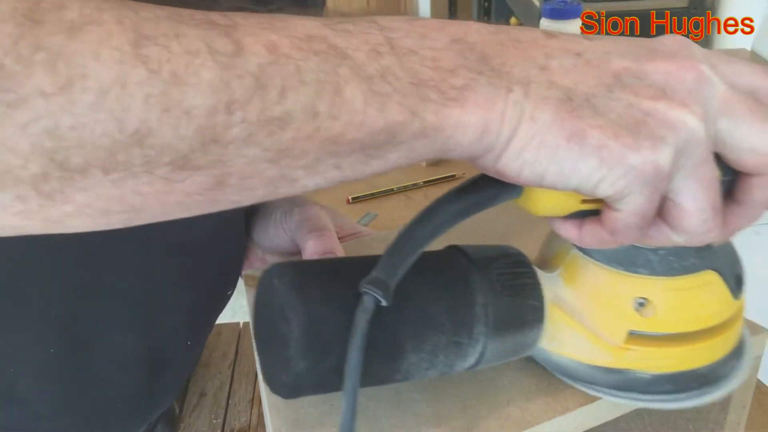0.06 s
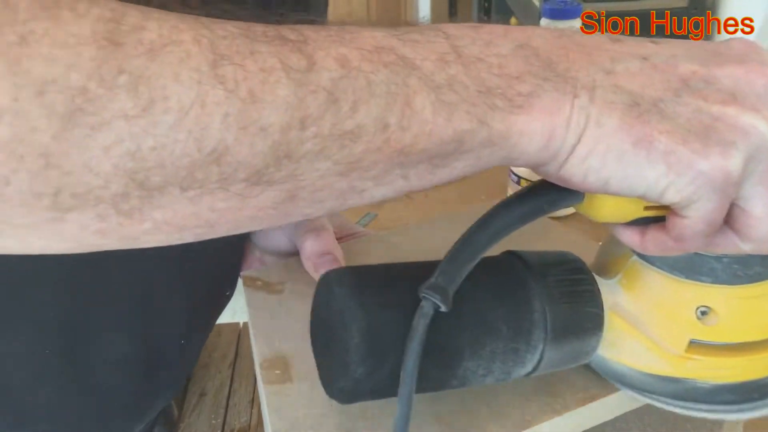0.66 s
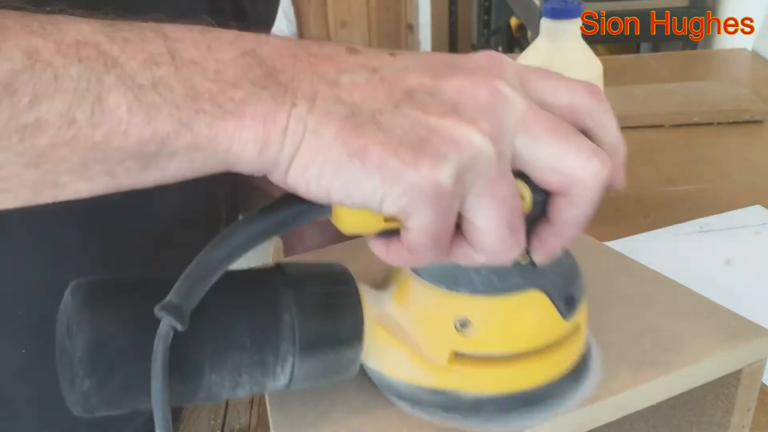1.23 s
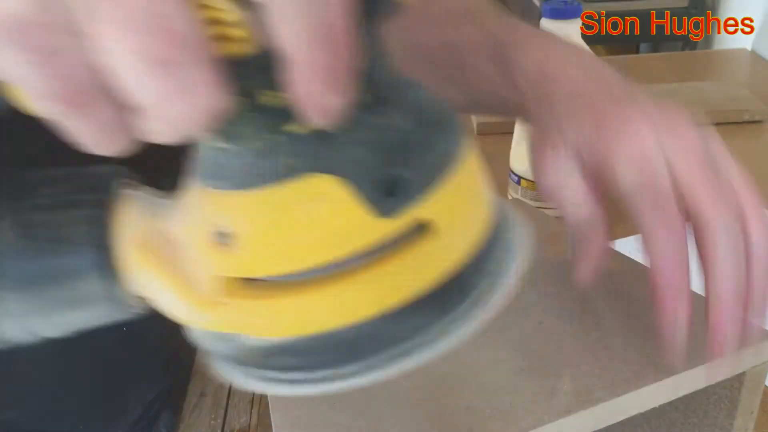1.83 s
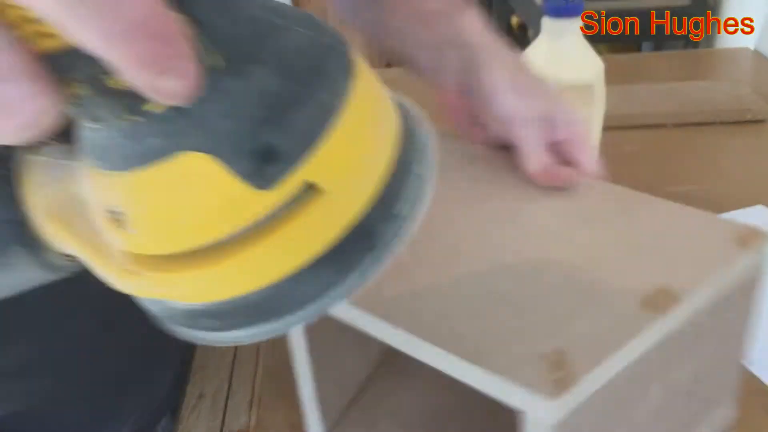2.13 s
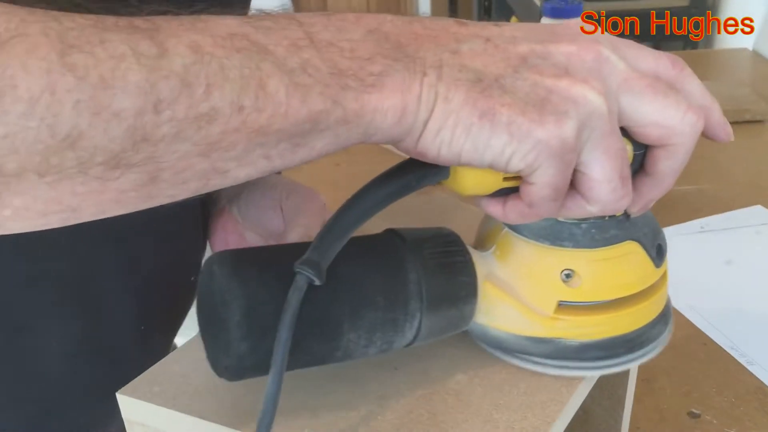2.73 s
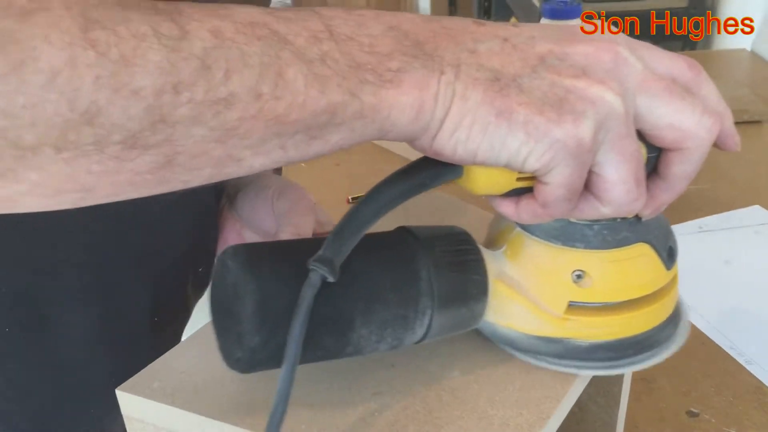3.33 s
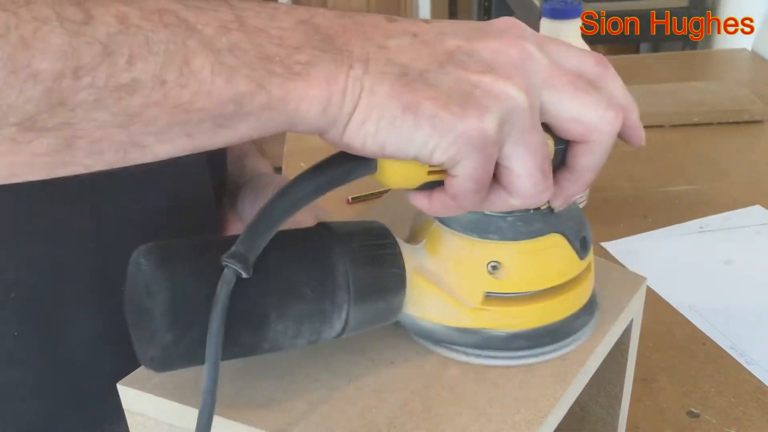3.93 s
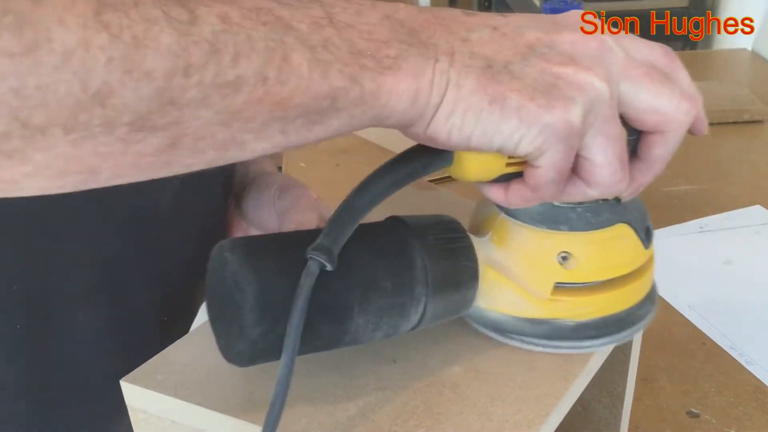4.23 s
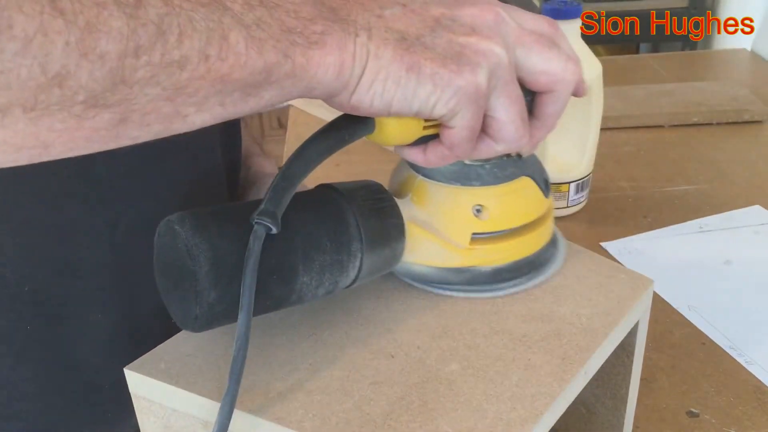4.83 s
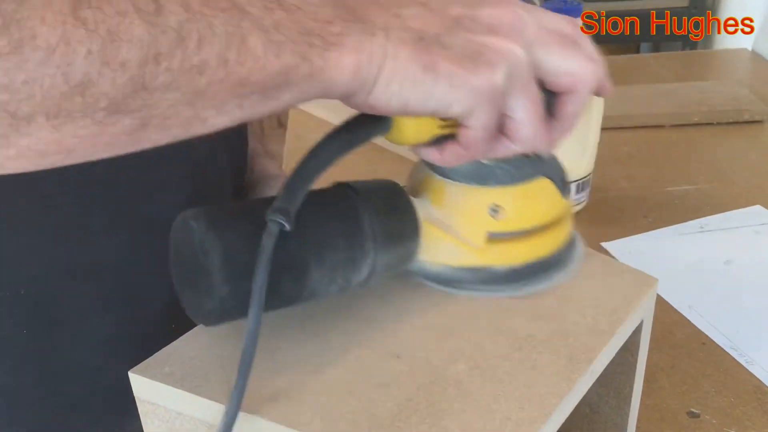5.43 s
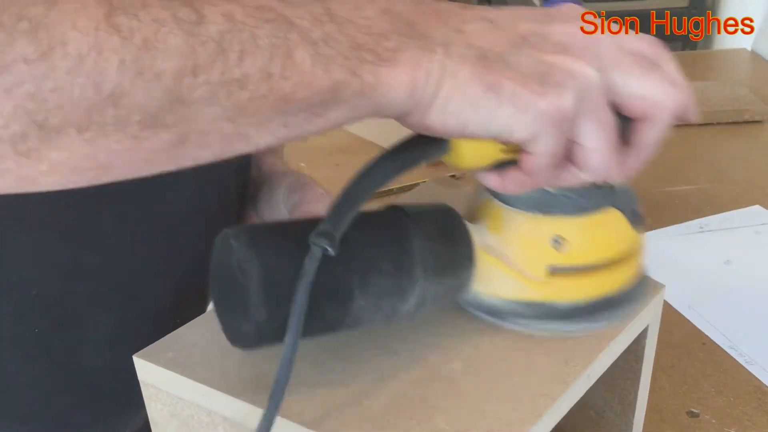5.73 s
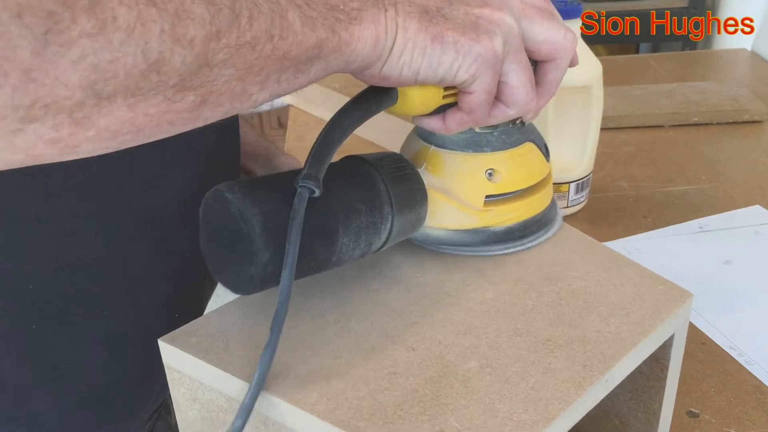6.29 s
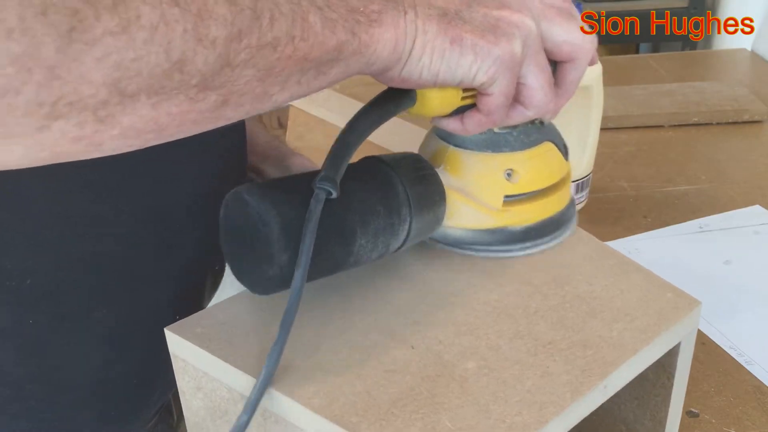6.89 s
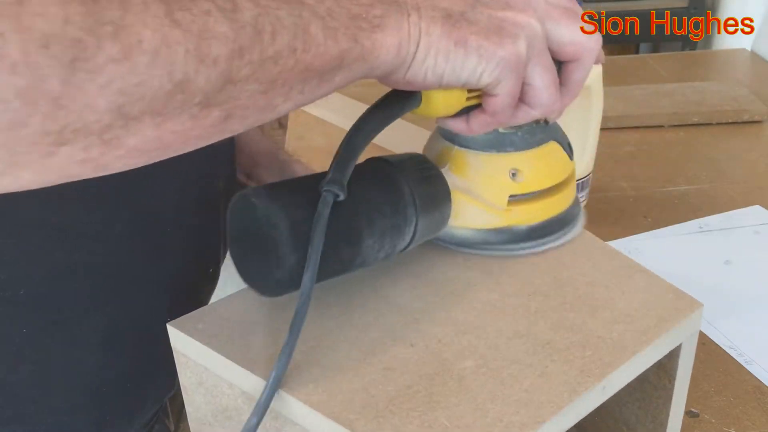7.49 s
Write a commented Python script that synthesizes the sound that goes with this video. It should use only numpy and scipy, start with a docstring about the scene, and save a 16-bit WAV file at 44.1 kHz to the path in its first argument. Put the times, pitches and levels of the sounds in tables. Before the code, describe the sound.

An electric orbital sander hums and whines on a wooden box, lifts briefly and speeds up, then goes back to sanding.

```python
"""A random orbital sander works the top of a small wooden box in a workshop. From the start its off-centre
pad hums at shaft rate and throbs in bouts as it rocks on the panel; motor and fan whine over grit and air.
Near 2 s the tool is lifted: it speeds up, the hum falls away, the loose pad rattles, the box is turned
and bumps the bench. By 2.7 s the pad is down again, buzzing on its rim. It settles flat by 5.6 s and
sands on, with one more soft bump near 7 s."""
import sys
import numpy as np
from scipy import signal
from scipy.fft import rfft, irfft, next_fast_len
from scipy.io import wavfile
from scipy.ndimage import map_coordinates

SR = 44100
rng = np.random.default_rng(int(sys.argv[2]) if len(sys.argv) > 2 else 0)


def master(y):
    """Save y as 16-bit WAV."""
    cut = np.clip(np.atleast_2d(y).T, -1, 1)
    pcm = np.round(cut * 32767)  # scale
    wavfile.write(sys.argv[1], SR, pcm.astype(np.int16))


N = 332955
TIME = np.arange(N) / SR


def pad_hum(shaft, speed_hz, lift, chatter, hum_gain, drone_gain):
    """The orbiting pad shakes tool and panel at shaft rate and its octave; both stutter as it skips."""
    # hum between dips: time_s, level_db
    hum_levels = [(0, -46.5), (.09, -40), (.2, -53.5), (.38, -40.5), (1.08, -41), (1.38, -40.5),
                  (1.6, -39.5), (1.72, -48), (2.2, -53.5), (2.55, -41), (2.66, -36.5), (3.2, -37),
                  (4.15, -39), (4.45, -41.5), (5.35, -36.5), (5.55, -41), (6.05, -37), (6.8, -38.5),
                  (7.49, -41), (7.55, -44.5)]
    # panel drone: time_s, level_db
    drone_levels = [(0, -41), (.09, -36), (.7, -42), (1, -43), (1.06, -63), (1.18, -44.5), (1.55, -50),
                    (1.75, -64), (2.5, -64), (3.13, -40.5), (3.95, -49.5), (4.3, -45), (4.7, -50),
                    (5.28, -42), (6.05, -51.5), (6.4, -47.5), (6.8, -55.5), (7.55, -48)]
    hum_db = curves(hum_levels)[0] + (3.1 * chatter + 1.1 * lift) * walk(32)
    hum = undb(hum_db) * hum_gain * partial(shaft + phase_slip(speed_hz), scatter=0.089, rate_hz=35)
    grip_loss_db = (1 + 4 * chatter) * np.maximum(walk(18), 0) ** 2
    drone_db = curves(drone_levels)[0] - grip_loss_db
    drone = undb(drone_db) * drone_gain * partial(2 * shaft, scatter=0.17 + 0.52 * chatter, rate_hz=50)
    return hum + drone


def rocking_dips(max_rise_s=0.081):
    """The pad rocks in even bouts, one dip a rock: time_s, rise_s, hum_depth_db, drone_depth_db."""
    # bouts: start_s, period_s, count, first_depth_db, last_depth_db, drone_depth_db
    bouts = [(0.047, 0.12, 3, 5, 30, 4.5), (0.444, 0.247, 3, 7.5, 11, 1.5), (1.022, 0.1, 4, 19, 10, -1.5),
             (1.425, 0.09, 4, 16, 6, -0.5), (2.602, 0.14, 3, 22, 33, 1), (2.956, .148, 4, 10.5, 7, 2),
             (3.56, 0.17, 3, 0.5, 3, 7), (4.448, 0.1197, 7, 19, 8, 19), (5.53, 0.33, 3, 7, 3, 4),
             (6.947, 0.24, 3, 12, 11, 5)]
    dips = []
    for start_s, period_s, count, first_db, last_db, drone_db in bouts:
        for k, hum_db in enumerate(np.linspace(first_db, last_db, round(count))):
            dips.append((start_s + k * period_s, min(period_s / 2, max_rise_s), hum_db, drone_db))
    return dips


def throb(drone_lead_s=0.023):
    """Gains of hum and drone as the pad rocks; the panel dips first."""
    hum_gain, drone_gain = 1, 1
    for time_s, rise_s, hum_db, drone_db in rocking_dips():
        hum_gain = hum_gain * dip_gain(time_s, rise_s, hum_db)
        drone_gain = drone_gain * dip_gain(time_s - drone_lead_s, rise_s, drone_db)
    return hum_gain, drone_gain


def phase_slip(speed_hz, panel_hz=373, width=0.43, deep_db=8.0, kept=0.297):
    """Two motions cancel in a deep dip: the hum slips towards the panel's pitch, then partly returns."""
    phase = 0
    for time_s, rise_s, depth_db, _ in rocking_dips():
        direction = np.sign(panel_hz - np.interp(time_s, TIME, speed_hz))
        age = (TIME - time_s) / (width * rise_s)
        slip = np.arctan(age * undb(depth_db)) - (1 - kept) * np.arctan(age)
        phase = phase + direction * np.clip(depth_db / deep_db, 0, 1) * slip
    return phase


def pad_knock(shaft, speed_hz, lift, rim, chatter, drone_gain, chatter_hz=46.14, dip_share=0.29):
    """One slightly mistimed knock a turn gives a stack of rough lines; they flutter as the pad skips."""
    # whole buzz: time_s, gain_db
    levels = [(0, -56.5), (.48, -52.5), (.72, -58.5), (1.2, -54), (1.68, -53), (1.93, -46), (2.5, -48.5),
              (2.7, -42.5), (3.35, -45), (4.05, -50), (4.6, -53.5), (5.12, -49), (5.6, -54.5), (5.89, -50),
              (6.03, -52.5), (6.6, -54.5), (7.5, -51)]
    # lines by pad contact: shaft_order, flat_db, rim_db, air_db
    lines = [(3, -4, -10.5, -15), (4, -9.5, -6, -8), (5, -3.5, -11, -10), (6, -9.5, -12, -4),
             (7, -9, -13.5, -13), (8, -14, -12.5, -17.5), (9, -11.5, -24.5, -11), (10, -13, -20, -6.5),
             (11, -5.5, -26.5, -5.5), (14, -32, -17, -10), (16, -12, -22, -16), (24, -16, -30.5, -10)]
    # housing resonances: centre_hz, width_hz, gain_db, chatter_extra_db
    housing = [(1946, 210, 0, 8.5), (2390, 93, 1, 6.5), (2784, 210, 6, -7.5)]
    jitter = 0.08 * walk(90)
    skip_phase = 2 * np.pi * chatter_hz * TIME + 2.55 * walk(18)
    buzz = 0
    for order, flat_db, rim_db, air_db in lines:
        wood_db = flat_db + rim * (rim_db - flat_db)
        line_db = wood_db + lift ** 2 * (air_db - wood_db)
        housing_db = sum((db + chatter * extra_db) / (1 + (2 * (order * speed_hz - hz) / width_hz) ** 2)
                         for hz, width_hz, db, extra_db in housing)
        flutter = 1 + 0.75 * chatter * np.sin(skip_phase + rng.uniform(0, 2 * np.pi))
        phase = order * (shaft + jitter) + rng.uniform(0, 2 * np.pi)
        line = partial(phase, scatter=0.54 - 0.1 * lift, rate_hz=45)
        buzz = buzz + undb(line_db + housing_db) * flutter * line
    buzz_db = curves(levels)[0] + 1.07 * walk(45) + 1.6 * walk(12)
    return buzz * undb(buzz_db) * drone_gain ** dip_share


def grit_and_air(shaft, lift, mains_buzz_hz=200):
    """Grit scrapes once an orbit, the free pad rattles, the fan blows through the dust bag."""
    # grit and rattle: time_s, level_db
    rub_levels = [(0, -49.5), (.35, -52), (.62, -54), (1.62, -47), (1.85, -44.5), (2.6, -43), (3.2, -50),
                  (3.65, -52.5), (4.3, -53), (5.15, -50), (5.5, -52), (5.9, -50.5), (6.15, -51.5),
                  (6.8, -52.5), (7.55, -48)]
    # dust bag hiss: time_s, level_db
    air_levels = [(0, -50.5), (.35, -49.5), (.6, -53), (1.6, -49), (1.7, -52.5), (1.9, -47), (2.35, -48),
                  (2.62, -46.5), (3.6, -51.5), (4.45, -52.5), (5.18, -49), (5.4, -51.5), (6.4, -51),
                  (6.85, -52), (7.2, -51.5), (7.55, -48)]
    # noise spectra: freq_hz, density_db
    grit_spectrum = [(30, -17.5), (60, -38), (110, -19.5), (250, -13), (550, -7), (950, -9.5), (1400, -2.5),
                     (2300, 1), (3300, -3), (4300, -0.5), (5300, -3), (6300, -3), (7600, -6.5),
                     (10000, -17), (15500, -38)]
    rattle_spectrum = [(40, -46), (75, -20), (150, -15.5), (350, -7), (700, -4.5), (1100, -6.5),
                       (1700, -0.5), (2600, -3), (3400, -3.5), (4700, -2), (6200, -3.5), (7700, -7.5),
                       (10000, -11.5), (15500, -21)]
    air_spectrum = [(1000, -24.5), (5000, -35.5), (8300, -4), (10000, -7), (11500, -2), (13300, -0.5),
                    (15500, -3)]
    scrape, shake, flow, roughness = rng.standard_normal((4, N))
    orbit = np.cos(shaft + 1.35 * walk(20))
    motor_pulse = np.cos(2 * np.pi * mains_buzz_hz * TIME)
    grains = scrape * undb(2.8 * roughness)
    grit = colour(grains * (1 + 0.28 * orbit), grit_spectrum) * undb(walk(35))
    shaking = shake * (1 + 0.026 * motor_pulse + 0.17 * orbit)
    rattle = colour(shaking, rattle_spectrum) * undb(0.5 * walk(50))
    rub = np.sqrt(1 - lift) * grit + np.sqrt(lift) * rattle
    air = colour(flow * (1 + 0.15 * orbit), air_spectrum)
    air_db = curves(air_levels)[0] + 0.33 * walk(16)
    return undb(curves(rub_levels)[0]) * rub + undb(air_db) * air


def motor_whine(shaft, lift, slot_lift_db=9.5, whistle_lift_db=3):
    """Slots and fan blades sing at high shaft orders; the pulsing field splits the slot line."""
    # multiples of shaft rate
    slot_order, blade_order, whistle_order = (12, 17, 23)
    # slot whine and top whistle, pad on the wood: time_s, level_db
    slot_levels = [(0, -62), (1.68, -65.5), (1.77, -56), (2.6, -62), (3, -57.5), (4.6, -63.5),
                   (4.93, -57.5), (5.7, -66), (5.96, -58), (6.8, -59), (7.55, -64)]
    whistle_levels = [(0, -61), (.4, -53.5), (1, -62), (1.26, -56), (1.5, -66), (1.7, -55.5), (2.9, -55.5),
                      (3.25, -63), (5.5, -65), (5.85, -57.5), (6.3, -70), (7.25, -60)]
    # blade whine, varying as the tool is moved: time_s, level_db
    blade_levels = [(0, -61), (.35, -58), (1, -69), (1.9, -60.5), (2.6, -69), (3.15, -57), (4.1, -68.5),
                    (4.75, -55), (5.7, -64.5), (6.35, -54.5), (7.55, -68)]
    # slot sidebands, motor running free: offset_hz, relative_db
    sidebands = [(-200, -7), (200, -3)]
    slots = partial(slot_order * shaft, scatter=0.4, rate_hz=25)
    for offset_hz, db in sidebands:
        phase = slot_order * shaft + 2 * np.pi * offset_hz * TIME
        slots = slots + undb(db) * (1 + lift) / 2 * partial(phase, scatter=0.58, rate_hz=20)
    blades = partial(blade_order * shaft, scatter=0.5, rate_hz=60)
    flicker = undb(2.2 * walk(11) + 2 * walk(35))
    whistle = flicker * partial(whistle_order * shaft, scatter=0.4, rate_hz=40)
    slot_db = curves(slot_levels)[0] + slot_lift_db * lift
    whistle_db = curves(whistle_levels)[0] + whistle_lift_db * lift
    return undb(slot_db) * slots + undb(curves(blade_levels)[0]) * blades + undb(whistle_db) * whistle


def pad_squeals(shaft, order=8):
    """Short rough squeals where the pad catches on the wood."""
    # catches: centre_s, length_s, level_db
    catches = [(1.175, 0.073, -49), (1.42, 0.26, -56.5), (5.695, 0.069, -53.5)]
    swell = sum(undb(db) * np.exp(-(2 * (TIME - centre_s) / length_s) ** 2)
                for centre_s, length_s, db in catches)
    return swell * partial(order * shaft, scatter=0.5, rate_hz=50)


def box_bumps(attack_s=0.043):
    """The box thuds softly on the bench as it is turned and as the pad lands."""
    # thuds: start_s, gain_db, pitch_hz, t60_s
    thuds = [(2.10, -49, 154.5, 0.27), (2.19, -49, 118, 0.23), (2.66, -62, 76, 0.32),
             (6.965, -56, 94.7, 0.24)]
    out = 0
    for start_s, gain_db, pitch_hz, t60_s in thuds:
        age_s = np.maximum(TIME - start_s, 0)
        ring = (1 - np.exp(-age_s / attack_s)) * np.exp(-np.log(1000) * age_s / t60_s)
        out = out + undb(gain_db) * ring * partial(2 * np.pi * pitch_hz * age_s, scatter=0.2, rate_hz=74)
    return out


def dip_gain(time_s, rise_s, depth_db):
    """Unity gain with one sharp, round-shouldered dip."""
    gain = np.ones(N)
    near = np.abs(TIME - time_s) < rise_s
    opening = np.sin(np.pi / 2 * (TIME[near] - time_s) / rise_s) ** 2
    gain[near] = np.sqrt(opening + (1 - opening) * undb(-depth_db) ** 2)
    return gain


def partial(phase, scatter, rate_hz):
    """A line of rms 1: a steady part plus a share wandering in size and phase."""
    in_phase = np.sqrt(2 * (1 - scatter ** 2)) + scatter * walk(rate_hz)
    return in_phase * np.sin(phase) + scatter * walk(rate_hz) * np.cos(phase)


def colour(noise, spectrum):
    """Noise shaped by (freq_hz, density_db) points; rms 1."""
    hz, db = np.transpose(spectrum)
    size = next_fast_len(N)
    bins_hz = np.maximum(np.arange(size // 2 + 1) * SR / size, 1)
    gain = undb(np.interp(np.log(bins_hz), np.log(hz), db))
    return unit(irfft(rfft(noise, size) * gain, size)[:N])


def walk(rate_hz):
    """Smooth random drift of rms 1."""
    coarse_s = TIME[::32]
    drift = map_coordinates(rng.standard_normal(2048), [coarse_s * rate_hz], order=2, mode="wrap")
    return unit(np.interp(TIME, coarse_s, drift))


def curves(table):
    """Table columns, interpolated linearly over time."""
    time_s, *columns = np.transpose(table)
    return [np.interp(TIME, time_s, column) for column in columns]


def undb(db):
    """Decibels to gain."""
    return 10 ** (np.asarray(db) / 20)


def unit(x):
    """Scale to rms 1."""
    return x / np.sqrt(np.mean(x ** 2))


def scene():
    """One shaft drives all sander layers; the box adds thuds. Two identical channels."""
    # shaft speed, sagging under hand pressure: time_s, speed_hz
    speeds = [(0, 381.9), (.69, 375.8), (1.04, 383.4), (1.17, 394.3), (1.34, 396.7), (1.61, 391.6),
              (1.84, 419), (2, 422), (2.62, 424), (2.98, 385.3), (3.22, 373.3), (3.65, 372.6),
              (4.09, 375.3), (4.53, 363.5), (4.75, 363.3), (5.04, 370), (5.59, 374.7), (5.85, 384.2),
              (6.1, 372), (6.35, 368.2), (6.59, 375), (6.93, 379), (7.43, 399.7), (7.55, 401.5)]
    # pad off the wood, pad tipped on its rim: time_s, lift_share, rim_share
    contact = [(0, 0, 0.08), (1.1, 0.32, 0.15), (1.62, 0.1, 0.3), (1.8, 0.94, 0.9), (2.48, 0.93, 0.3),
               (2.64, 0.44, 0.9), (3.1, 0.05, 0.78), (4.1, 0.07, 0.46), (4.6, 0.14, 0.22), (5.6, 0, 0),
               (7.55, 0.16, 0.22)]
    # skipping of a lightly pressed pad: time_s, chatter_share
    skipping = [(0, 0.02), (.9, 0.3), (1.5, 0.62), (1.8, 0), (2.5, 0.9), (2.7, 0.44), (3.4, 0.38),
                (4.4, 0.1), (5.6, 0.47), (5.9, 0.5), (6.1, 0), (7.05, 0.4), (7.25, 0.64), (7.55, 0.92)]
    speed_hz, = curves(speeds)
    lift, rim = curves(contact)
    chatter, = curves(skipping)
    hum_gain, drone_gain = throb()
    friction_waver = 0.000722 * (1 - lift) * walk(18)
    shaft = 2 * np.pi * np.cumsum(speed_hz * (1 + friction_waver)) / SR  # angle, rad
    hum = pad_hum(shaft, speed_hz, lift, chatter, hum_gain, drone_gain)
    knock = pad_knock(shaft, speed_hz, lift, rim, chatter, drone_gain)
    sander = hum + knock + pad_squeals(shaft) + motor_whine(shaft, lift) + grit_and_air(shaft, lift)
    return np.tile(sander + box_bumps(), (2, 1))


def record(dry):
    """Steep low-pass on the top treble."""
    cutoff_hz = 15750
    return signal.sosfilt(signal.ellip(12, 0.1, 80, cutoff_hz, fs=SR, output="sos"), dry)


dry = scene()
out = record(dry)
master(out)
```